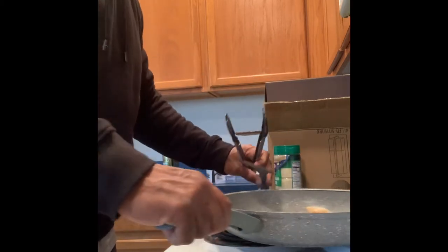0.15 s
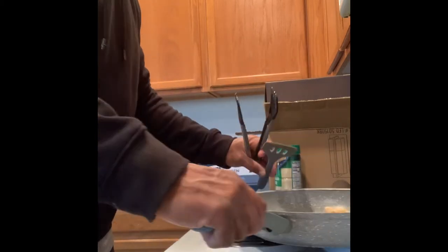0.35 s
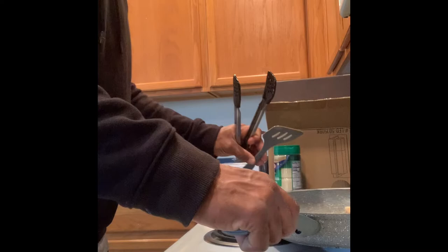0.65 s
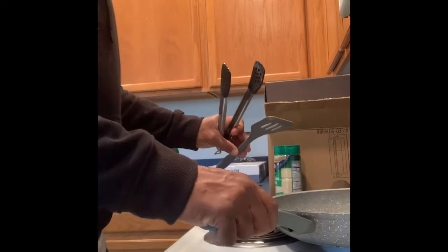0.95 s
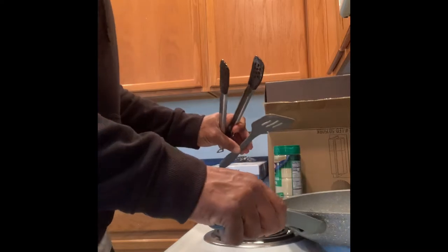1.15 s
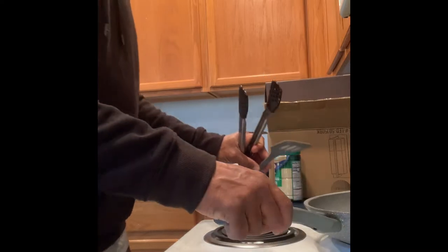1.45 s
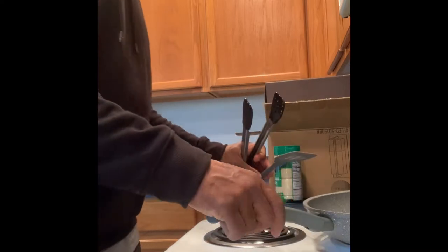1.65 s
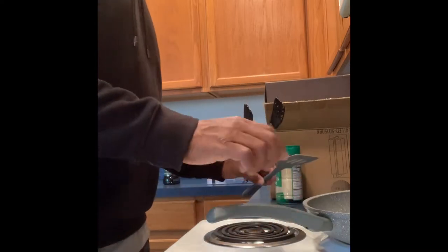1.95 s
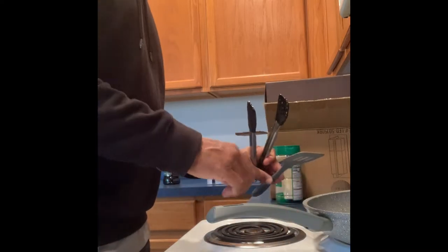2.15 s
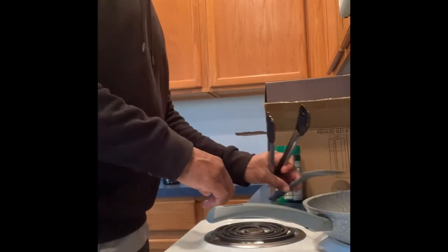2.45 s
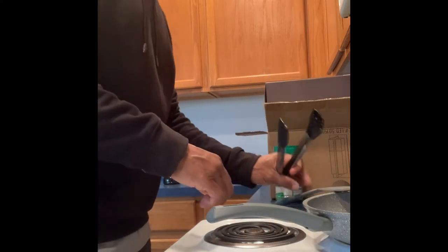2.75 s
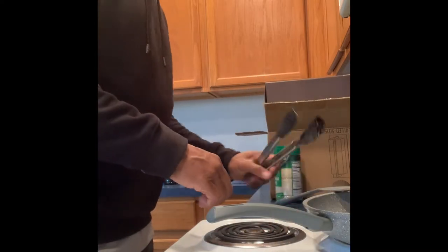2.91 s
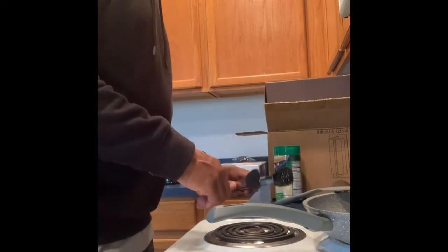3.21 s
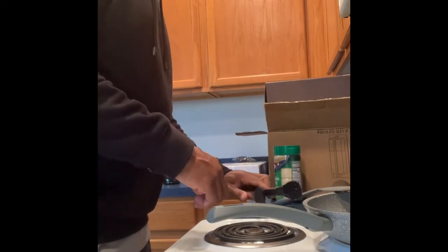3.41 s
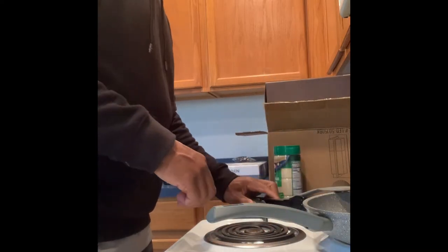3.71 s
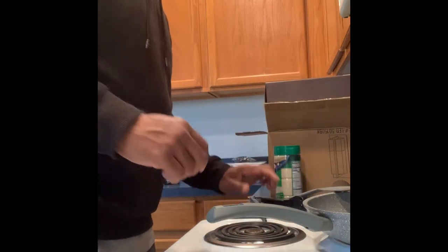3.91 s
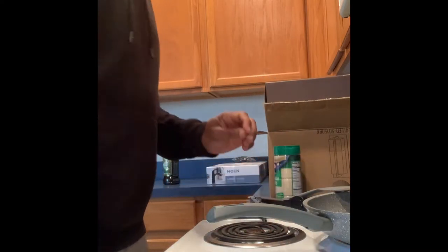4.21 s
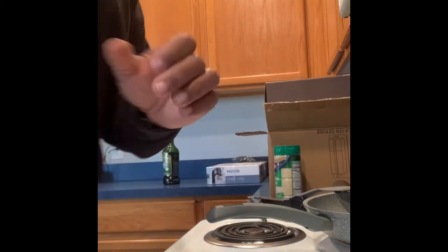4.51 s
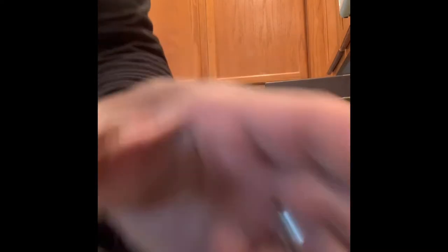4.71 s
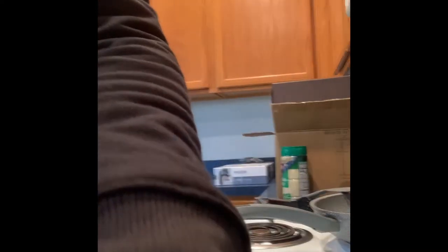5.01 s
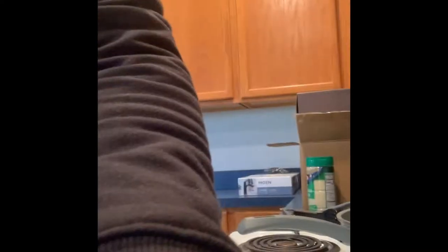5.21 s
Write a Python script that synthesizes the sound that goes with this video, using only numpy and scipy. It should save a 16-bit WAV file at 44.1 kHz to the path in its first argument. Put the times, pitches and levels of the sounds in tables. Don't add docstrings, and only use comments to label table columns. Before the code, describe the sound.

In a small kitchen, a frying pan is dragged in two gritty, hollow strokes across electric stove coils and knocks down. Fine ticks patter as the coil cools, then utensils land with one hard, ringing clank. Small scuffs and faint ticks follow over room tone, low hum and soft sizzle. A nearby phone microphone is finally grabbed, with loud close thumps and finger taps.

```python
import sys
import numpy as np
from scipy import signal
from scipy.fft import rfft, irfft, next_fast_len
from scipy.io import wavfile

SR = 44100
rng = np.random.default_rng(int(sys.argv[2]) if len(sys.argv) > 2 else 0)


def field_ratio(decibels):
    return 10 ** (np.asarray(decibels, dtype=float) / 20)


def wrap_up_sound(samples):
    columns = np.atleast_2d(samples).T
    tamed = np.clip(columns, -1, 1)
    steps = np.round(tamed * 32767).astype(np.int16)
    wavfile.write(sys.argv[1], SR, steps)


N = 236464
SIZE = next_fast_len(N + SR // 2)
HZ = np.maximum(np.arange(SIZE // 2 + 1) * SR / SIZE, 1)

# start_s, peak_db [dB]
COIL_TICKS = [(1.725, -46), (1.8116, -52.5), (1.8784, -46), (1.929, -48.5), (1.9692, -46), (2.0073, -45.5),
              (2.0536, -44.5), (2.1164, -48.5), (2.2033, -41.5), (2.291, -52), (2.3484, -44),
              (2.3884, -50.5), (2.4305, -51.5), (2.4586, -54.5), (2.502, -48.5), (2.5605, -40),
              (2.6272, -48), (2.659, -39.5)]


def rms_one(x):
    return x / np.sqrt(np.mean(x ** 2) + 1e-20)


def in_time(rows, silent_db=-120):
    s, *columns = np.transpose(rows)
    return [np.interp(np.arange(N) / SR, s, c, silent_db, silent_db) for c in columns]


def at_hz(points, hz):
    point_hz, value = np.transpose(points)
    return np.interp(np.log(hz), np.log(point_hz), value)


def colour(x, spectrum):
    closed = [(spectrum[0][0] / 2, -70)] + list(spectrum) + [(spectrum[-1][0] * 1.03, -70)]
    return rms_one(irfft(rfft(x, SIZE) * field_ratio(at_hz(closed, HZ)), SIZE)[:N])


def band(x, low_hz, high_hz):
    return signal.sosfilt(signal.butter(2, [low_hz, high_hz], "band", fs=SR, output="sos"), x)


def drift(rate_hz):
    r = np.exp(-2 * np.pi * rate_hz / SR)
    return rms_one(signal.lfilter([1], [1, -2 * r, r * r], rng.standard_normal(N + SR))[SR:])


def ring(x, hz, t60):
    r = field_ratio(-60 / (t60 * SR))
    w = 2 * np.pi * hz / SR
    return signal.lfilter([0, np.sin(w)], [1, -2 * r * np.cos(w), r * r], x + 1e-18)


def add(out, s, piece):
    i = round(s * SR)
    out[i:i + len(piece)] += piece[:N - i]


def fade(t60, rise):
    t = np.arange(int(t60 * SR) + 8) / SR
    shape = (1 - np.exp(-t / rise)) * field_ratio(-60 * t / t60)
    return t, shape / shape.max()


def grains(per_s, spread_db):
    sizes = field_ratio(spread_db * np.minimum(rng.exponential(1, N), 5)) * rng.choice([-1, 1], N)
    return sizes * (rng.random(N) < per_s / SR)


def contact(under_db, follows):
    # start_s, pressure_db [dB], speed_db [dB]
    strokes = [
        [(0.0, -28, 5.5), (0.1, -35, 7.5), (0.2, -33.5, -0.5), (0.4, -35.5, -1), (0.62, -37.5, -0.5),
         (0.83, -36.5, 4.5), (0.95, -36.5, -5.5), (1.049, -46.5, 4.5)],
        [(1.051, -38, 1), (1.12, -33.5, 6.5), (1.24, -32.5, 4), (1.31, -39, 5.5), (1.37, -34.5, -2),
         (1.46, -43, -2.5), (1.58, -44, -6.5), (1.95, -66, -10)],
    ]
    # start_s, pressure_db [dB], speed_db [dB], t60_s
    slips = [(0.069, -28, -0.5, 0.48), (0.284, -42, 7.5, 0.26), (1.067, -32.5, 14.5, 0.062),
             (1.191, -27.5, 7, 0.11), (1.498, -39, 1, 0.11), (2.202, -52, 1, 0.118),
             (2.65, -36.5, -8, 0.34), (2.678, -30.5, -5.5, 0.26), (2.74, -49, -26, 0.5),
             (3.618, -43.5, -10, 0.4), (3.645, -44, -5, 0.33), (3.689, -40.5, -24.5, 0.3),
             (3.793, -39.5, -4.5, 0.26), (3.815, -50, -0.5, 0.63), (3.875, -40.5, -1.5, 0.1)]
    out = np.zeros(N)
    for stroke in strokes:
        pressure, speed = in_time(stroke)
        out += field_ratio(pressure + under_db + follows * speed * (pressure > -100))
    for s, db, speed, t60 in slips:
        add(out, s, field_ratio(db + under_db + follows * speed) * fade(t60, rise=0.00268)[1])
    return out


def slide():
    # pitch_hz, width_hz, level_db
    pan_rings = [(446, 30.3, 6), (792.3, 43, 7.5), (1130, 90, -5), (1510, 42, -13), (1940, 200, -4),
                 (2049, 67, -3), (2970, 200, -16), (3830, 84, -19.5), (5100, 49, -38)]
    # pitch_hz, level_db [dB per Hz]
    grit_spectrum = [(30, -2), (60, 3), (120, -18), (250, -54.5), (450, 15), (800, -14), (1300, -0.5),
                     (2200, -3), (3500, -5.5), (5000, -11), (7000, -30), (9500, -20.5), (12000, -35),
                     (15500, -30)]
    catches = grains(per_s=2500, spread_db=3.5) * field_ratio(1.73 * drift(36.0))
    rings = np.zeros(N)
    for k, (hz, width, db) in enumerate(pan_rings):
        rings += field_ratio(db) * rms_one(ring(catches, hz, 2.03 / width)) * (-1) ** k
    grit = colour(catches, grit_spectrum)
    body = rms_one(rms_one(rings) + field_ratio(-6.5) * rms_one(band(grit, 400, 5400)))
    low = rms_one(band(body, 126.7, 776))
    mid = rms_one(band(body, 1390, 3760))
    bright = rms_one(band(grit, 4000, 11300))
    rumble = rms_one(band(rng.standard_normal(N), 47.5, 220))
    out = contact(under_db=-2.0, follows=0.01) * low
    out += contact(under_db=-7.5, follows=0.88) * mid
    out += contact(under_db=-10.5, follows=0.94) * bright
    return out + contact(under_db=-10.5, follows=0.01) * rumble


def knocks():
    # start_s, peak_db [dB], hardness_hz, damping [0-1, 1 rings freely]
    blows = [(0.158, -25.5, 1550, 1), (1.073, -18.5, 1510, 0.5), (1.197, -29, 1210, 0.42),
             (1.481, -21, 1520, 0.56), (1.501, -24, 1610, 0.2), (1.599, -46, 1490, 0.9),
             (2.561, -43, 1500, 0.6), (2.651, -21, 1500, 0), (2.678, -3.5, 1800, 0.36),
             (2.712, -18, 1510, 0.61), (3.624, -56, 1490, 0.6), (3.691, -28, 1490, 0.4),
             (3.795, -46, 1500, 0.7), (3.885, -28, 1500, 0)]
    # pitch_hz, level_db, t60_s
    pan_modes = [(224.5, -11.5, 0.77), (426, 0.5, 0.45), (708, -0.5, 0.18), (762.7, -3, 0.44),
                 (806.6, 6, 0.18), (1013, -5, 0.14), (1273, -34.5, 0.41), (1800, -20, 0.21),
                 (2220, -8.5, 0.07), (2300, -41, 0.48), (2600, -51.5, 0.15), (2950, -31, 0.39),
                 (3327, -57.5, 0.28), (3600, -52.5, 0.47)]
    out = np.zeros(N)
    t = np.arange(SR // 3) / SR
    rise = 1 - np.exp(-t / 0.0023)
    for s, db, hard_hz, damping in blows:
        for hz, level_db, t60 in pan_modes:
            own_db = rng.normal(0, 3.0)
            tilt = (hard_hz / 1500) ** np.log2(hz / 800)
            decay = field_ratio(-60 * t / (t60 * max(damping, 0.1)))
            level = field_ratio(db + level_db + own_db - 14.0) * tilt
            add(out, s, level * decay * rise * np.sin(2 * np.pi * hz * t))
    return out


def ticks():
    # pitch_hz, level_db [dB per Hz]
    tick_spectrum = [(1200, -20), (1650, -12), (2200, -16.5), (3500, -15), (5000, -1.5), (7000, -2.5),
                     (8200, -8.5), (9500, 2), (11000, -11.5), (12500, -25), (15000, -7), (15900, -12.5)]
    # start_s, peak_db [dB]
    pan_ticks = [(1.0637, -25.5), (1.1095, -27.5), (1.1888, -35), (1.204, -19.5), (1.3065, -35)]
    # start_s, peak_db [dB]
    late_ticks = [(2.8116, -39.5), (2.8949, -54), (3.0072, -34.5), (3.1767, -41), (3.3022, -42),
                  (3.3419, -51), (3.4211, -44), (3.5439, -36.5), (3.62, -42.5), (3.7928, -44.5),
                  (3.8782, -64), (4.1166, -44), (4.2112, -48), (4.368, -43.5), (4.5227, -57.5),
                  (4.5835, -47), (4.8345, -46.5), (4.8953, -59)]
    shimmer = colour(rng.standard_normal(N), tick_spectrum)
    gate = np.zeros(N)
    for s, db in pan_ticks + COIL_TICKS + late_ticks:
        add(gate, s, field_ratio(db - 4.0) * fade(t60=0.075, rise=0.00088)[1])
    return shimmer * gate


def coil():
    clicks = np.zeros(N)
    for s, db in COIL_TICKS:
        add(clicks, s, field_ratio([db - 12]))
    return ring(clicks, hz=1657, t60=0.094)


def thumps():
    # start_s, peak_db [dB],
    # pitch_hz, t60_s, rise_s
    body_thumps = [(0.214, -21.5, 60, 0.144, 0.017), (1.28, -30, 65, 0.15, 0.014),
                   (1.331, -24.5, 59, 0.098, 0.0064), (1.367, -32.5, 74, 0.206, .01),
                   (1.47, -28, 59.1, 0.247, 0.0143), (3.62, -30.5, 112.8, 0.1, 0.0078),
                   (3.689, -27, 117, 0.092, 0.011), (3.789, -33.5, 129, 0.098, 0.0024),
                   (3.27, -55.5, 120, 0.7, 0.1), (4.376, -35, 60.5, 0.1, .006),
                   (4.419, -39, 43.8, .2, 0.011), (5.054, -0.5, 105.4, 0.047, 0.0018),
                   (5.077, -12.5, 87.2, 0.15, 0.002), (5.119, -5.5, 103.7, 0.12, 0.0031),
                   (5.147, -6.5, 66.36, 0.158, 0.0026), (5.177, -7, 62, 0.0546, .008),
                   (5.19, 2.5, 205, 0.0079, 0.0016), (5.193, -4, 80, 0.078, 0.0031),
                   (5.254, -22.5, 52, 0.27, 0.011), (5.28, -29.5, 104.6, 0.18, 0.0069)]
    # start_s, peak_db [dB], pitch_hz,
    # t60_s, rise_s
    hollow_taps = [(1.505, -28.5, 450, 0.128, 0.0082), (2.2036, -52, 1669, 0.046, .001),
                   (2.2205, -33, 1190, 0.012, 0.00047), (2.2205, -43.5, 1575, .02, .0005),
                   (2.225, -48, 900, 0.045, 0.0009), (2.731, -37.5, 235, 0.13, 0.007),
                   (2.223, -35.5, 486, .05, .003), (2.232, -36, 334, .07, 0.0031),
                   (3.992, -38.5, 420, 0.12, 0.0063), (4.905, -45, 430, 0.13, .01),
                   (5.103, -20.5, 237.3, 0.14, .004), (5.339, -28.5, 406, 0.031, .002),
                   (5.352, -28.5, 380, 0.044, 0.0024)]
    out = np.zeros(N)
    for s, db, hz, t60, rise in body_thumps + hollow_taps:
        t, shape = fade(t60, rise)
        add(out, s, -field_ratio(db) * shape * np.sin(2 * np.pi * hz * t * (1 - 0.3 * t)))
    return out


def grip():
    # start_s, peak_db [dB], case_hz, snap_db [dB]
    finger_taps = [(5.026, -23, 691, -44), (5.0504, 0.5, 609, -24.5), (5.056, -13.5, 640, -28),
                   (5.081, -21, 612, -39), (5.096, -19, 600, -38), (5.107, -18, 420, -54),
                   (5.153, -18, 610, -43), (5.162, -16, 680, -44), (5.179, -24, 415, -40),
                   (5.188, -8, 399.5, -42.5), (5.195, -13.5, 528, -42), (5.237, -27.5, 695, -48.5),
                   (5.254, -21, 511, -62), (5.272, -25, 483, -50)]
    # start_s, pressure_db [dB]
    skin_pressure = [(5.02, -48), (5.03, -37.5), (5.08, -38.5), (5.13, -37.5), (5.145, -52.5), (5.16, -35),
                     (5.21, -47), (5.3, -57), (5.36, -57)]
    taps, snap = np.zeros(N), np.zeros(N)
    for s, db, hz, snap_db in finger_taps:
        t, shape = fade(t60=0.013, rise=0.00069)
        case = np.sin(2 * np.pi * hz * t)
        case += 1.03 * np.sin(2 * np.pi * 2.078 * hz * t)
        case += 0.29 * np.sin(2 * np.pi * 3.4 * hz * t)
        add(taps, s, field_ratio(db - 6.5) * shape * case)
        add(snap, s, field_ratio(snap_db + 8.0) * fade(t60=0.0067, rise=0.0003)[1])
    pressure_db, = in_time(skin_pressure)
    skin = grains(per_s=1900, spread_db=3.0)
    low_rub = field_ratio(7.5) * rms_one(band(skin, 138, 540))
    high_rub = field_ratio(1.5) * rms_one(band(skin, 935, 1533))
    edge = rms_one(band(rng.standard_normal(N), 2200, 7300))
    return taps + field_ratio(pressure_db) * (low_rub + high_rub) + snap * edge


def air():
    # pitch_hz, level_db [dB per Hz]
    tone_spectrum = [(25, -6), (60, 5), (100, -8.5), (250, 0.5), (450, -5.5), (800, -6.5), (1300, -13),
                     (2200, -24.5), (3500, -44)]
    # pitch_hz, width_hz, level_db
    hollow_spots = [(235, 55, -7), (480, 36, -6.5), (861.4, 65, -14), (1053, 19.4, -19.5)]
    # pitch_hz, level_db [dB per Hz]
    hiss_spectrum = [(2200, -5), (3500, -1.5), (4600, 2), (5500, 3.5), (7000, 1), (9500, -2.5),
                     (10800, -7.5), (12000, -24), (15000, -5), (15900, -12.5)]
    # start_s, level_db
    sizzle = [(0.0, -74), (1.3, -57), (1.76, -63.5), (2.4, -63), (2.75, -62.5), (3.1, -63), (3.8, -60.5),
              (4.5, -55), (5.36, -55)]
    stirred_tone = contact(under_db=-9, follows=0.0123)
    hiss_level = field_ratio(in_time(sizzle)[0]) + contact(under_db=-15, follows=0.98)
    tone = colour(rng.standard_normal(N), tone_spectrum)
    rings = sum(field_ratio(db) * rms_one(ring(tone, hz, 2.17 / width)) for hz, width, db in hollow_spots)
    tone = field_ratio(-54.5) * (tone + rings) + stirred_tone * band(tone, 358, 5000)
    tone = tone * field_ratio(1.5 * drift(5))
    crackle = grains(per_s=11000, spread_db=0.0)
    hiss = colour(crackle, hiss_spectrum) * hiss_level * field_ratio(1.5 + 2.06 * drift(17))
    hum = field_ratio(-54.5 + 1.5 * drift(3)) * np.sin(2 * np.pi * 118.2 * np.arange(N) / SR)
    return tone + hiss + hum


def echoes(t60):
    cloud = fade(t60, rise=0.0019)[1]
    cloud = cloud * rng.standard_normal(len(cloud))
    return rfft(cloud / np.sqrt(np.sum(cloud ** 2)), SIZE)


def scene():
    # pitch_hz, likeness [0-1]
    port_likeness = [(60, 0.92), (250, 0.94), (800, 0.65), (1300, 0.12), (2200, 0.84), (3500, 0.68),
                     (5000, 0.92), (16000, 0.98)]
    stove = rfft(slide() + ticks() + coil() + knocks(), SIZE)
    room = stove * (1 + field_ratio(-10.0) * echoes(0.26))
    mid = room + rfft(air() + thumps() + grip(), SIZE)
    alike = at_hz(port_likeness, HZ)
    side = mid * echoes(0.051) * np.sqrt((1 - alike) / (1 + alike))
    left, right = irfft([mid + side, mid - side], SIZE)[:, :N]
    return np.array([np.roll(left, 5), right])


def roll_off(x):
    return signal.sosfilt(signal.butter(12, 16820, fs=SR, output="sos"), x)


def record(dry):
    dry = signal.sosfilt(signal.butter(2, 30, "high", fs=SR, output="sos"), dry)
    dip = signal.sosfilt(signal.butter(1, [4200, 5200], "bandstop", fs=SR, output="sos"), dry)
    dry = dip + field_ratio(-6.0) * (dry - dip)
    mix = 1.032 * np.tanh(dry / 1.12)
    return roll_off(mix)


dry = scene()
out = record(dry)
wrap_up_sound(out)
```